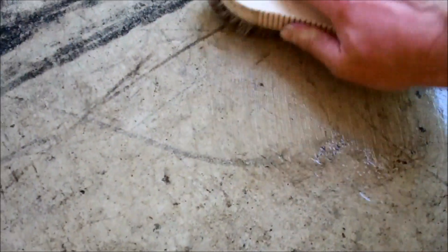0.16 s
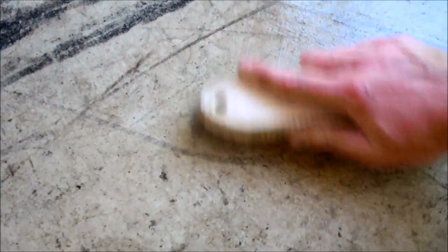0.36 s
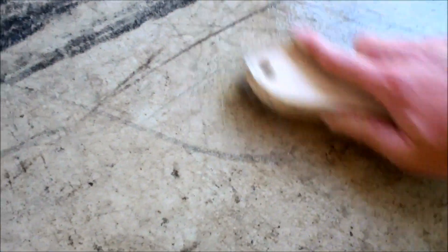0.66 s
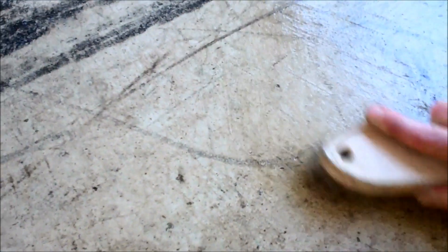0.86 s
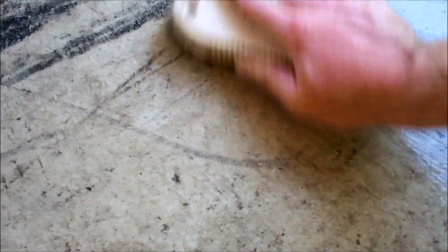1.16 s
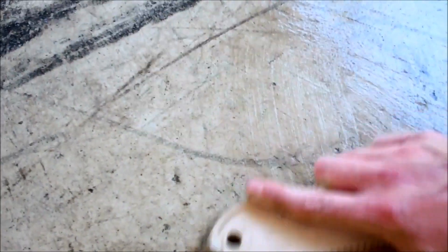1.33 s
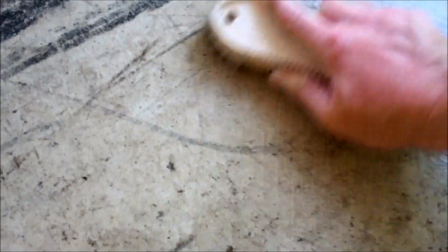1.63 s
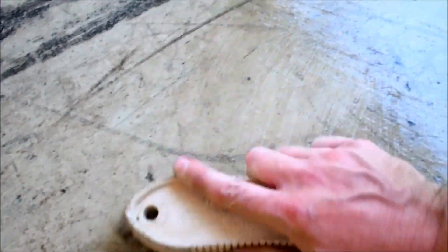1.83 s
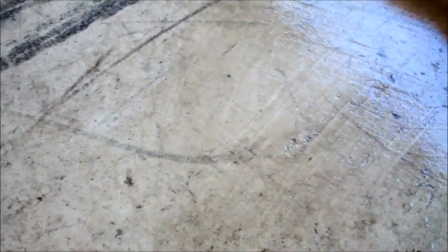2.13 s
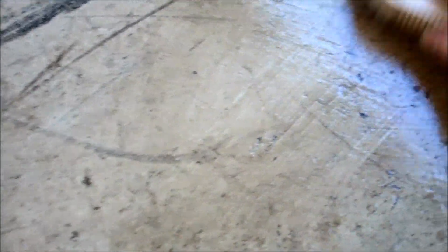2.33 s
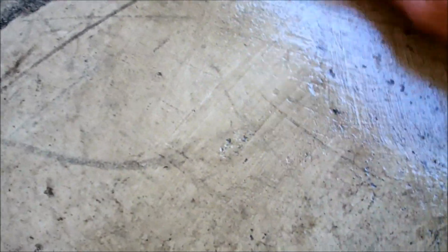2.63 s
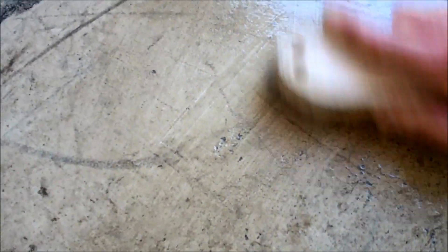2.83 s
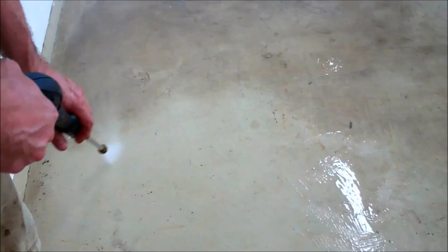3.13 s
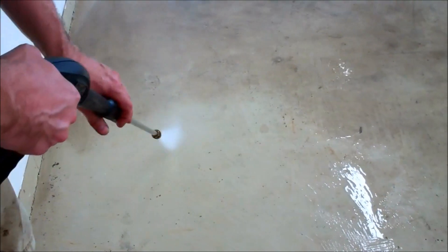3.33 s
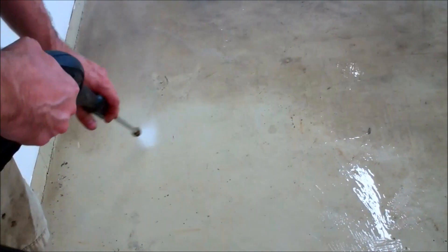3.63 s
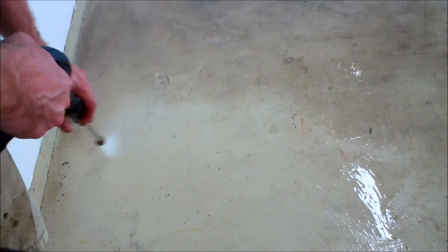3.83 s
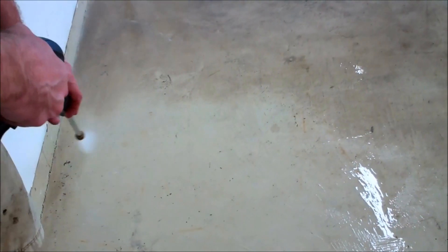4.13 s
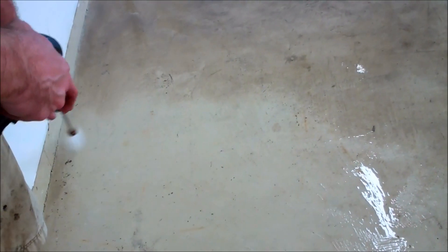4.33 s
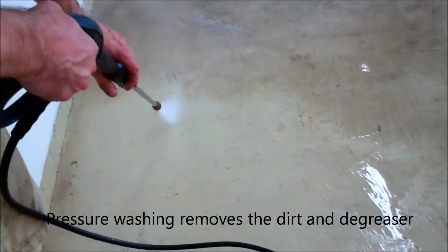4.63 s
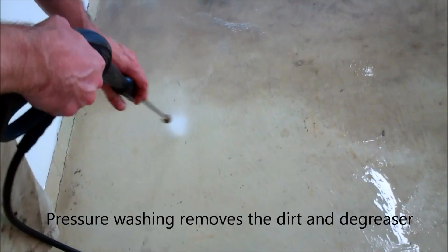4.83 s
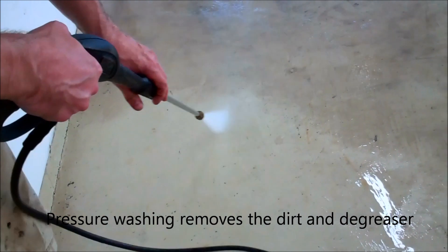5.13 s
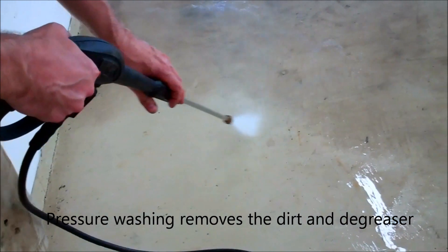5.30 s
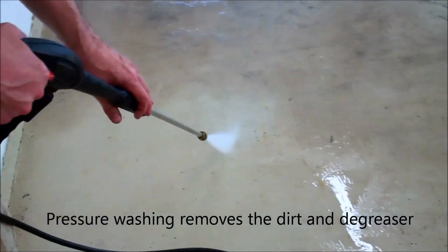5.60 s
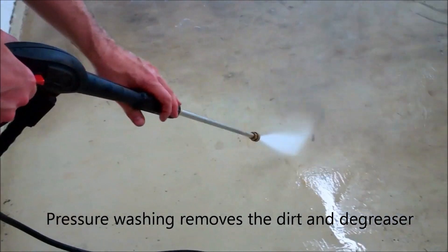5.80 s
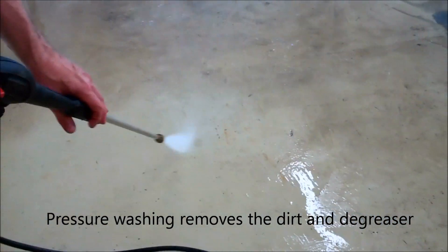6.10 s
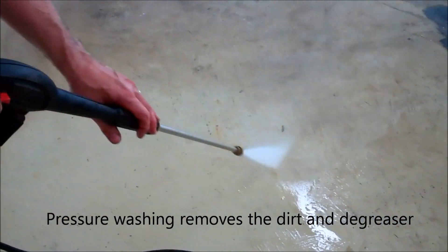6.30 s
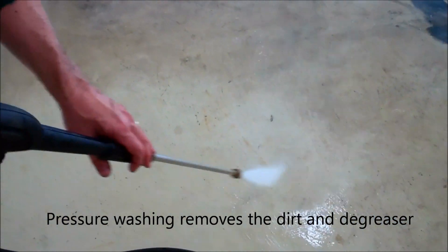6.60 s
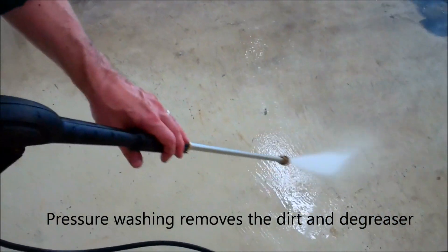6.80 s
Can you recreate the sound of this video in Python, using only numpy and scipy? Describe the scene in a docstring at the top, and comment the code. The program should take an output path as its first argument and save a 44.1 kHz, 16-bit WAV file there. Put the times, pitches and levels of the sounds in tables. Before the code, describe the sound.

A stiff brush scrubs damp concrete in quick raspy to-and-fro strokes, then cuts abruptly to a pressure washer's steady pump tone and hissing spray.

```python
"""A stiff wooden hand brush scrubs a damp concrete garage floor, seven times to and fro, over a faint hum:
showers of tiny impacts, coloured as rasp, scratch and tip hiss. Wandering sines add squeaks and short rasps,
and ringing modes make the block stutter once on the floor, about two seconds in. Then a pressure washer
takes over: sines locked to a shaft make the pump's steady tone, noise and droplets the hissing fan of water."""
import sys
import numpy as np
from scipy import signal
from scipy.fft import rfft, irfft, next_fast_len
from scipy.io import wavfile
from scipy.ndimage import uniform_filter1d, map_coordinates

SR = 44100
rng = np.random.default_rng(int(sys.argv[2]) if len(sys.argv) > 2 else 0)


def digitize_waveform(pressure):
    """Quantize a signal to 16-bit integers and store it at the path in sys.argv[1].

    Rows of a 2-D input are taken as channels; values are limited to [-1, 1].
    """
    field = np.atleast_2d(pressure).T
    bounded = np.clip(field, -1, 1)
    quanta = np.round(bounded * 32767).astype(np.int16)
    wavfile.write(sys.argv[1], SR, quanta)


N = 306495
TIME = np.arange(N) / SR  # s
FREQS = np.maximum(np.fft.rfftfreq(2 * next_fast_len(N // 2 + 1), 1 / SR), 1)  # Hz


def from_db(db):
    """Decibels to gain."""
    return np.exp(np.asarray(db) * (np.log(10) / 20))


def rms_one(x):
    """Scale to an rms of 1."""
    return x / np.sqrt(np.mean(x ** 2) + 1e-20)


def in_time(rows):
    """The columns of a curve at every sample."""
    seconds, *columns = np.transpose(rows)
    return [np.interp(TIME, seconds, column) for column in columns]


def in_pitch(rows):
    """The columns of a spectrum at every frequency, straight lines over log frequency."""
    hz, *columns = np.transpose(rows)
    return [np.interp(np.log(FREQS), np.log(hz), column) for column in columns]


def drift(rate_hz):
    """Slow chance with a spread of 1: noise through two equal low-pass poles at the given rate."""
    step = 40  # samples between the slow values
    pole = np.exp(-2 * np.pi * rate_hz * step / SR)
    noise = rng.standard_normal(N // step + 2002)
    slow = signal.lfilter([1], [1, -2 * pole, pole * pole], noise)[2000:]  # settled part only
    return np.interp(np.arange(N) / step, np.arange(len(slow)), rms_one(slow))


def swell(s, length):
    """A smooth rise and fall around a moment, 1 on top."""
    return np.exp(-2 * np.minimum(((TIME - s) / length) ** 2, 20))


def swells(rows):
    """The gain of a series of swells."""
    return sum(from_db(db) * swell(s, length) for s, length, db in rows)


def bell(hz, width_hz):
    """The shape of a resonance, 1 on top."""
    return 1 / (1 + (2 * (FREQS - hz) / width_hz) ** 2)


def grains(per_s, spread_db):
    """Two unrelated showers of tiny impacts of uneven size and either sign; rms 1."""
    born = rng.random((2, N)) < per_s / SR
    chance = rng.laplace(size=(2, N))
    size = from_db(spread_db * np.minimum(np.abs(chance), 4))
    return rms_one(born * np.sign(chance) * size)


# Stereo images of the brush, and of the spray, air and echoes. Each row: frequency in Hz,
# left-right likeness (0 to 1), left over right in dB, phase by which left leads in radians.
BRUSH_IMAGE = [(100, .96, -.9, -.05), (1300, .96, -.9, -.05), (2600, .98, 0, -.03), (4500, .86, .3, -.2),
               (5500, .56, 3.7, -.7), (7700, .57, 2.2, -1.5), (11000, .7, 2.7, -2.3), (14000, .7, 0, -3.05)]
WIDE_IMAGE = [(60, .99, -.1, 0), (170, .965, -1.2, 0), (550, .92, -1.4, .05), (1150, .82, -.8, .1),
              (1700, .53, -.8, .1), (3600, .32, -.4, .6), (4600, .27, 2.5, .8), (7500, .38, 2, 0),
              (10000, .47, -.7, 0), (14000, .52, -.2, 0)]


def radiate(showers, colour_db, image):
    """Colour two unrelated signals and spread them between the microphones; rms 1."""
    alike, balance_db, lead = in_pitch(image)
    alike = np.clip(alike, 0, 1)
    mid, side = rfft(showers, 2 * (len(FREQS) - 1)) * from_db(colour_db)
    mid, side = mid * np.sqrt(1 + alike), side * np.sqrt(1 - alike)
    leftward = from_db(balance_db / 2) * np.exp(.5j * lead)
    left, right = (mid + side) * leftward, (mid - side) / leftward
    return rms_one(irfft(np.array([left, right]))[:, :N])


def placed(x, left_lead_us):
    """A moving source reaches one microphone a little before the other."""
    shift = left_lead_us * 1e-6 * SR / 2  # samples, half the lead on each side
    left = map_coordinates(x[0], [np.arange(N) + shift], order=3, mode="nearest")
    right = map_coordinates(x[1], [np.arange(N) - shift], order=3, mode="nearest")
    return np.array([left, right])


# The hum in the garage. Each row: frequency in Hz, typical level in dB rms.
HUM_LINES = [(104.4, -75), (157.5, -80.5), (419.3, -80)]
# The octave of the lowest line swells twice. Each row: middle in seconds, length in seconds,
# typical level on top in dB rms.
HUM_OCTAVE = [(1.1, 0.43, -71), (2.56, 0.44, -73)]
# Colour of the still air. Each row: frequency in Hz, relative level in dB per Hz.
AIR_COLOUR = [(20, -22), (48, -16), (85, 1.5), (200, 2.5), (450, 0), (1200, 1.5), (4000, -6.5),
              (14000, -12)]


def background(air_db, waver, swell_db):
    """Still air as coloured noise, and a hum of sines that waver in phase (radians) and level."""
    lines = [(hz, from_db(db)) for hz, db in HUM_LINES]
    lines.append((2 * HUM_LINES[0][0], swells(HUM_OCTAVE)))
    hum = 0
    for hz, gain in lines:
        level = gain * from_db(swell_db * drift(1.9)) * np.sqrt(2)
        hum = hum + level * np.sin(2 * np.pi * hz * TIME + waver * drift(3.3))
    air = radiate(rng.standard_normal((2, N)), in_pitch(AIR_COLOUR)[0], WIDE_IMAGE)
    return hum + from_db(air_db) * air


# A stroke shorter than the usual one is faster, and its tips hiss more.
USUAL_STROKE_S, HURRY_DB_PER_OCTAVE = 0.25, 1.5
# The tufts flip over without sliding at either end of a stroke;
# a long stroke spends a smaller share speeding up and slowing down, by this power of its length.
FLIP_S, RAMP_SHRINKS = .006, .15


def stroke_motion(strokes, habit):
    """Each stroke speeds up, runs and stops: speed 0-1 and the gains of rasp, scratch and tips."""
    rise, fall, block_swell_db, bristle_swell_db, rasp_db, scratch_db, tip_db = habit
    speed, gains = np.zeros(N), np.zeros((3, N))
    for start, end, pressure_db in strokes:
        on = (TIME > start + FLIP_S) & (TIME < end - FLIP_S)
        along = (TIME[on] - start - FLIP_S) / (end - start - 2 * FLIP_S)  # 0 to 1
        hurry = USUAL_STROKE_S / (end - start)
        stretch = hurry ** RAMP_SHRINKS
        going = np.sin(np.pi / 2 * np.clip(along / (rise * stretch), 0, 1))
        stopping = np.sin(np.pi / 2 * np.clip((1 - along) / (fall * stretch), 0, 1))
        speed[on] = going * stopping
        block_db = pressure_db + block_swell_db * (along - .5)
        bristle_db = pressure_db + bristle_swell_db * (along - .5)
        hurry_db = HURRY_DB_PER_OCTAVE * np.log2(hurry)
        gains[:, on] = from_db([rasp_db + block_db, scratch_db + bristle_db,
                                tip_db + bristle_db + hurry_db])
    return speed, gains


# Strokes, push and pull in turn. Each row: start in seconds, end in seconds, pressure in dB.
STROKES = [(-0.008, 0.155, 0.5), (0.152, 0.307, -1), (0.308, 0.471, -0.5), (0.485, 0.644, -0.4),
           (0.652, 0.96, 0.5), (0.983, 1.291, 0.5), (1.245, 1.488, 1.1), (1.462, 1.7, -0.5),
           (1.651, 1.99, -0.7), (1.975, 2.371, 0.5), (2.336, 2.62, -0.8), (2.61, 2.841, -0.8),
           (2.823, 3.023, -1), (3.011, 3.218, -1.2)]
# The push leans in as it goes, the pull lets go. Each row: share of the stroke spent speeding up,
# share spent slowing down, swell of the block in dB, swell of the bristles in dB,
# then the base levels of rasp, scratch and tip hiss in dB.
PUSH = (0.35, 0.4058, 5.5, 4, -49, -50, -38)
PULL = (0.27, 0.35, -11, -6, -51, -49.5, -38.5)
# Colours of the block's rasp, the bristles' scratch and the tips' hiss.
# Each row: frequency in Hz, relative level in dB per Hz.
RASP_COLOUR = [(45, -45), (150, -21), (400, -15), (620, -10), (900, -3), (1600, 0), (2600, 1), (3250, 1),
               (3650, -4.5), (4400, -11.5)]
SCRATCH_COLOUR = [(2500, -26.5), (3600, -3.5), (4050, -3), (4400, 1.5), (4750, 1), (5050, 1), (6200, -.5),
                  (7000, -3.5), (8500, -17), (12000, -30)]
TIP_COLOUR = [(4500, -39), (6500, -17), (7500, -9), (10000, -5), (12000, -2), (13700, -0.5)]
# Resonances of the block and the tufts, added to the rasp. Each row: frequency in Hz, width in Hz,
# boost on the push in dB, boost on the pull in dB.
BRUSH_BODY = [(1250, 180, 7.5, 7), (2150, 910, 3.5, 1.4), (3120, 230, 2.5, 1.5)]
# The brush wanders across the floor. Each row: time in seconds,
# microseconds by which its sound reaches the left microphone first.
BRUSH_PLACE = [(0, 6), (.6, 6), (.95, -13), (1.28, 16), (1.6, -4), (1.95, 19), (2.3, -28), (2.75, -3),
               (3.2, 2)]


def brush(flicks_per_s, spread_db, judder_db, rasp_power, scratch_power, tip_power):
    """Bristles catch on the grit and flick free, more often and more brightly at speed."""
    out = 0
    for way, habit in enumerate((PUSH, PULL)):
        speed, (rasp_gain, scratch_gain, tip_gain) = stroke_motion(STROKES[way::2], habit)
        flicks_now = flicks_per_s * (1 + speed) / 2
        # the tufts lean the other way on the pull and ring differently
        body_db = sum(boosts[way] * bell(hz, width) for hz, width, *boosts in BRUSH_BODY)
        rasp_db = in_pitch(RASP_COLOUR)[0] + body_db
        rasp = radiate(grains(flicks_now, spread_db), rasp_db, BRUSH_IMAGE)
        scratch = radiate(grains(flicks_now, spread_db), in_pitch(SCRATCH_COLOUR)[0], BRUSH_IMAGE)
        tips = radiate(grains(2 * flicks_now, spread_db), in_pitch(TIP_COLOUR)[0], BRUSH_IMAGE)
        sound = rasp * rasp_gain * speed ** rasp_power
        sound += scratch * scratch_gain * speed ** scratch_power
        sound += tips * tip_gain * speed ** tip_power
        out = out + sound * from_db(judder_db * drift(37))
    return placed(out, in_time(BRUSH_PLACE)[0])


def garage(x, wall_cut_hz, t60_s):
    """A diffuse tail from hard walls, dull, and alike at both microphones in the bass."""
    t = TIME[:SR // 2]
    colour_db = -10 * np.log10(1 + (FREQS / wall_cut_hz) ** 2)
    tail = radiate(rng.standard_normal((2, N)), colour_db, WIDE_IMAGE)[:, :len(t)]
    tail = tail * from_db(-60 * t / t60_s) * (t > .005)  # silent until the first echoes
    return signal.fftconvolve(x, tail / np.sqrt(np.sum(tail ** 2) / 2), axes=1)[:, :N]


# Early in each pull the tufts bite and chatter: place and length are shares of the stroke,
# and the stroke's pressure adds to the level.
BITE_AT, BITE_LENGTH, BITE_HZ, BITE_SPREAD_HZ, BITE_DB = .23, .2, 3040, 750, -49.5
# Squeaks and rasps of the tufts: narrow lines squeak, wide ones rasp; the row at 1.71 s is
# the ringing tail of the squeak before it. Each row: middle in seconds, length in seconds,
# frequency in Hz, spread of the line in Hz, level on top in dB rms.
SQUEAKS = [(.88, .07, 3030, 750, -49.5), (1.135, 0.032, 1230, 120, -51.5), (1.637, 0.032, 3750, 70, -47),
           (1.71, 0.1, 3820, 80, -58), (2.11, .09, 1280, 350, -52.5)]


def squeaks():
    """The bite of every pull, squeaks and short rasps: sines of wandering phase that swell and die away."""
    out = np.zeros(N)
    bites = []
    for start, end, pressure_db in STROKES[1::2]:
        stroke_s = end - start
        bites.append((start + BITE_AT * stroke_s, BITE_LENGTH * stroke_s,
                      BITE_HZ, BITE_SPREAD_HZ, BITE_DB + pressure_db))
    for s, length, hz, spread_hz, db in bites + list(SQUEAKS):
        on = np.abs(TIME - s) < 2 * length
        t = TIME[on] - s
        # the phase wanders at random, which widens the line
        wander = np.cumsum(rng.standard_normal(len(t))) * np.sqrt(np.pi * spread_hz / SR)
        wander = uniform_filter1d(wander, size=24)
        envelope = np.sqrt(2) * from_db(db) * np.exp(-2 * (t / length) ** 2)
        out[on] += envelope * np.sin(2 * np.pi * hz * t + wander)
    return out


def ring(clicks, hz, t60):
    """A unit click sets a decaying sine ringing from a height of 1."""
    r, w = from_db(-60 / (t60 * SR)), 2 * np.pi * hz / SR
    return signal.lfilter([0, np.sin(w)], [1, -2 * r * np.cos(w), r * r], clicks + 1e-18)


# The block hits the floor. Each row: time in seconds, strength of the blow in dB.
KNOCKS = [(1.9144, -51), (1.9273, -41.5), (1.9392, -40.5), (1.962, -50)]
# Modes of the block. Each row: frequency in Hz, relative level in dB, time to fall by 60 dB in seconds.
KNOCK_MODES = [(135, -20, 0.07), (215, -11, 0.059), (439, -8.5, 0.084), (495, -2.5, 0.037),
               (644, -2.5, 0.043), (743, -6, 0.055)]


def knocks():
    """The wooden block tips over and stutters on the concrete; it is too small to give deep bass."""
    clicks = np.zeros(N)
    for s, blow_db in KNOCKS:
        clicks[round(s * SR)] = from_db(blow_db)
    rings = sum(from_db(db) * ring(clicks, hz, t60) for hz, db, t60 in KNOCK_MODES)
    return signal.sosfilt(signal.butter(2, 110, "high", fs=SR, output="sos"), rings)


# A dull rub beside the brush, three times. Each row: middle in seconds, length in seconds,
# level on top in dB rms.
RUBS = [(2.33, 0.072, -60.5), (2.57, 0.15, -62), (3.18, 0.13, -62)]


def rubs(hz, width_hz):
    """Uneven friction as noise through one resonance, swelling and dying away."""
    colour_db = 40 * np.log10(bell(hz, width_hz))  # the bell squared
    return swells(RUBS) * radiate(rng.standard_normal((2, N)), colour_db, BRUSH_IMAGE)


TONE_ORDER = 18  # the main tone as a multiple of the shaft rate
# The pump labours slightly. Each row: time in seconds, pitch of its main tone in Hz.
PUMP_PITCH = [(3.25, 522.3), (3.8, 528), (4.05, 522), (4.35, 520.3), (5.0, 521.8), (5.25, 523.6),
              (5.5, 523.3), (5.9, 521.6), (6.75, 522.4), (6.93, 525)]


def shaft_angle():
    """The turning of the pump's shaft in radians, which drives its tones and the throb of the jet."""
    return 2 * np.pi * np.cumsum(in_time(PUMP_PITCH)[0] / TONE_ORDER) / SR


# Loudness of the main tone. Each row: time in seconds, level in dB rms before flutter and panning.
PUMP_TONE = [(3.25, -53.5), (4.35, -54.5), (5.0, -53.8), (5.25, -51), (6.15, -48), (6.43, -51.5),
             (6.76, -47.5), (6.93, -51)]
# Lesser shaft orders that stand out. Each row: multiple of the shaft rate, level in dB rms.
PUMP_ORDERS = [(2, -75.5), (4, -69), (5, -69.5), (6, -75.5), (7, -66.5), (8, -65), (9, -71.5), (11, -74),
               (12, -65.5), (15, -73.5), (17, -65), (19, -71), (20, -66), (21, -69), (22, -70), (23, -69.5),
               (24, -77), (25, -64.5), (28, -67), (29, -70.5), (35, -66), (39, -69), (41, -73), (45, -76),
               (50, -63.5)]


def pump(shaft, flutter_db, waver, pan_db):
    """One loud tone and a comb of weak ones, all locked to the shaft."""
    tone_db = in_time(PUMP_TONE)[0] + flutter_db * drift(10)
    tone = from_db(tone_db) * np.sin(TONE_ORDER * shaft)
    comb = 0
    for order, db in PUMP_ORDERS:
        # wall reflections bring each order to the two microphones in a slightly different phase
        apart = min(.022 * order, .45) * rng.standard_normal((2, 1))
        phase = 2 * np.pi * rng.random() + apart + waver * drift(2.8)
        comb = comb + from_db(db) * np.sin(round(order) * shaft + phase)
    return np.sqrt(2) * (comb + tone * from_db([[pan_db / 2], [-pan_db / 2]]))


# The lance sweeps from side to side. Each row: time in seconds, microseconds by which the spray
# reaches the left microphone first, force of the jet in dB.
JET_SWEEP = [(3.25, 16, 1.2), (3.45, 9, 0.5), (3.85, 10, -0.1), (4.15, 21, 0), (4.45, 23, -1),
             (4.72, 7, -.5), (5.55, -10, -0.5), (6.05, -10, 1.5), (6.25, 5, 1), (6.45, -9, 1.7),
             (6.7, -8, 3), (6.93, -26, 1.5)]
# Colours of the jet's three parts. Each row: frequency in Hz, relative level in dB per Hz.
ROAR_COLOUR = [(20, -36), (85, -29), (130, -12), (220, -11.5), (300, 0), (430, -4.5), (620, 0.5),
               (900, -0.5), (1150, 2), (1450, -2.5), (1750, -8), (3000, -23)]
HISS_COLOUR = [(900, -27), (1500, -6.5), (1900, 0), (2600, 0.5), (3400, 1.5), (4100, -0.5), (5200, -1),
               (6400, 0.1), (7200, -2), (8100, 0), (10000, -4), (14000, -14)]
MIST_COLOUR = [(6000, -30), (8300, -13), (9700, -3), (11500, 0.5), (13000, 0.2)]
# Base levels; the mist follows the force fully, the hiss by a share, the roar not at all.
ROAR_DB, HISS_DB, MIST_DB, HISS_FOLLOWS = -48, -42, -40, 0.42


def jet(shaft, drops_per_s, spread_db, throb, flicker_db):
    """Droplets batter the floor; the roar throbs with every turn of the pump."""
    left_lead_us, force_db = in_time(JET_SWEEP)
    roar = radiate(rng.standard_normal((2, N)), in_pitch(ROAR_COLOUR)[0], WIDE_IMAGE)
    roar = roar * (1 + throb * np.cos(shaft))
    hiss = radiate(grains(drops_per_s, spread_db), in_pitch(HISS_COLOUR)[0], WIDE_IMAGE)
    mist = radiate(grains(drops_per_s, spread_db), in_pitch(MIST_COLOUR)[0], WIDE_IMAGE)
    spray = hiss * from_db(HISS_DB + HISS_FOLLOWS * force_db) + mist * from_db(MIST_DB + force_db)
    flicker = from_db(flicker_db * drift(6.7))
    return roar * from_db(ROAR_DB) + placed(spray, left_lead_us) * flicker


WASHER_ON_S, FADE_S = 3.2135, 0.014  # middle and length of the crossfade


def scene():
    """Scrubbing gives way abruptly to the washer."""
    bristles = brush(flicks_per_s=15000, spread_db=3.0, judder_db=0.51,
                     rasp_power=0.52, scratch_power=1.13, tip_power=1.45)
    close = bristles + squeaks() + knocks() + rubs(hz=486, width_hz=410)
    echoes = from_db(-13.0) * garage(close, wall_cut_hz=9700, t60_s=1)
    scrubbing = close + echoes + background(air_db=-61.0, waver=0.41, swell_db=1.2)
    shaft = shaft_angle()
    washing = pump(shaft, flutter_db=0.5, waver=0.21, pan_db=-3.0)
    washing = washing + jet(shaft, drops_per_s=25000, spread_db=3.0, throb=0.096, flicker_db=0.52)
    switched = np.clip((TIME - WASHER_ON_S) / FADE_S + .5, 0, 1)
    return scrubbing * (1 - switched) + washing * switched


CUTOFF_HZ = 14220


def record(dry):
    """The top is cut steeply above the cutoff."""
    return signal.sosfilt(signal.ellip(18, .1, 85, CUTOFF_HZ, fs=SR, output="sos"), dry)


dry = scene()
out = record(dry)
digitize_waveform(out)
```